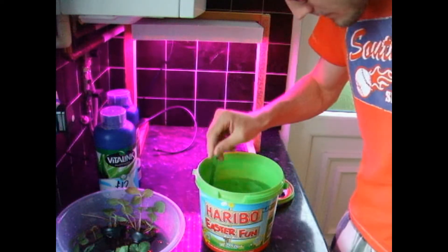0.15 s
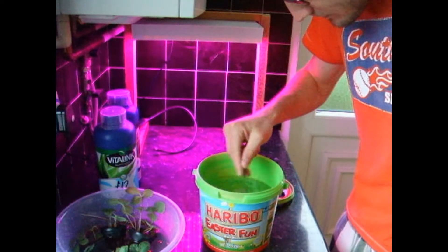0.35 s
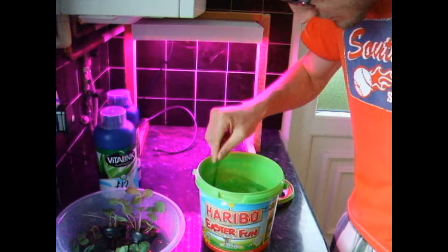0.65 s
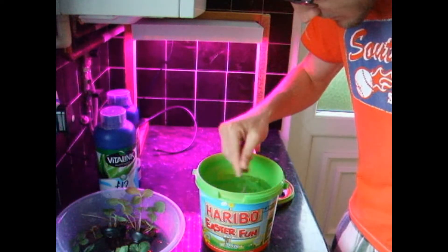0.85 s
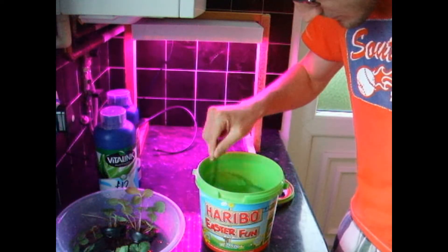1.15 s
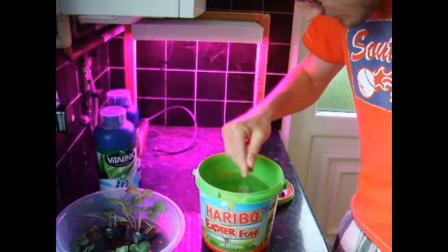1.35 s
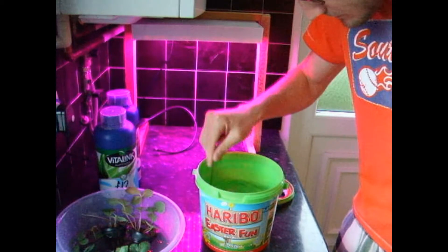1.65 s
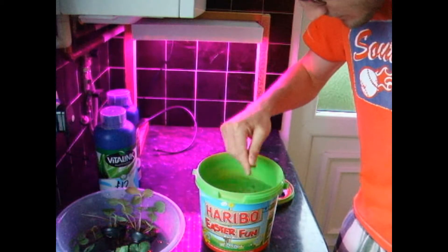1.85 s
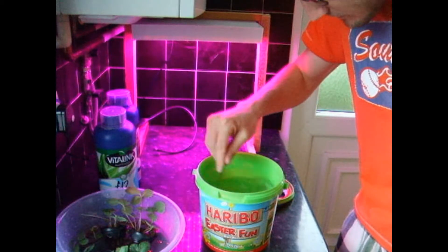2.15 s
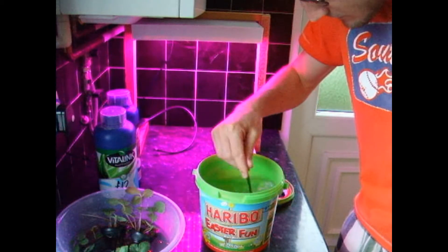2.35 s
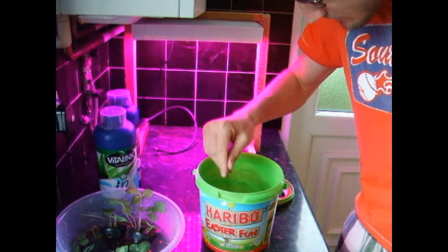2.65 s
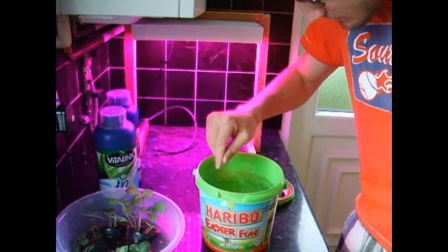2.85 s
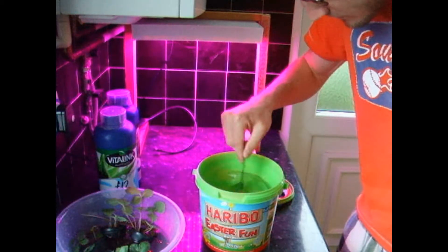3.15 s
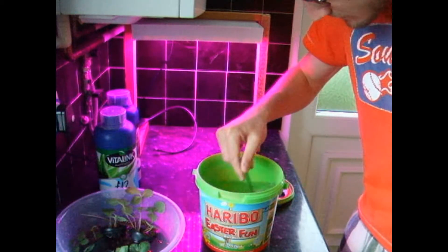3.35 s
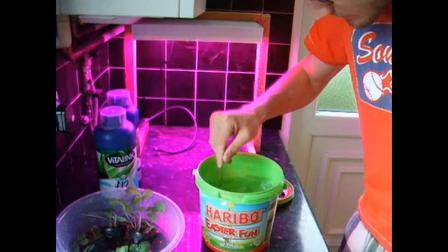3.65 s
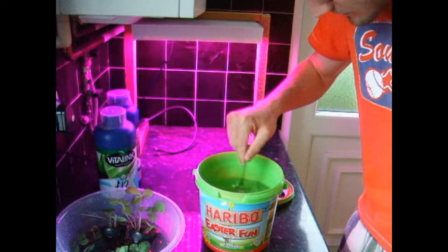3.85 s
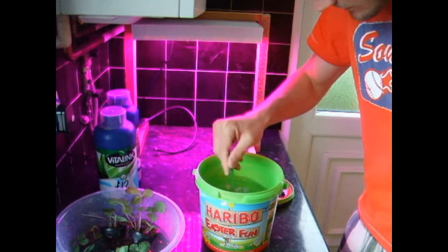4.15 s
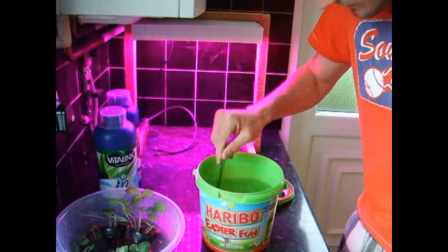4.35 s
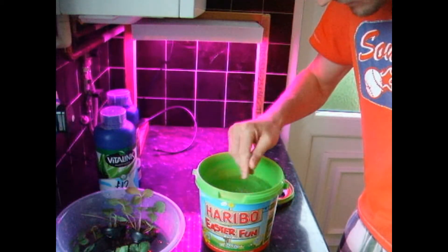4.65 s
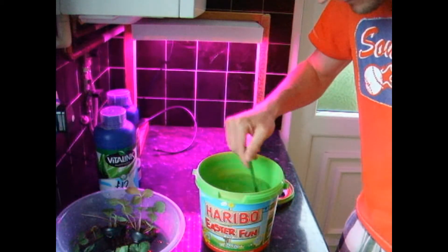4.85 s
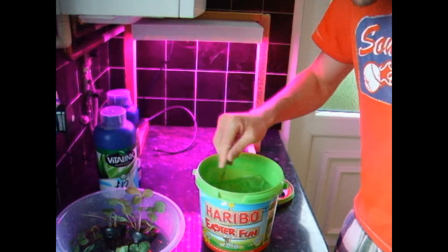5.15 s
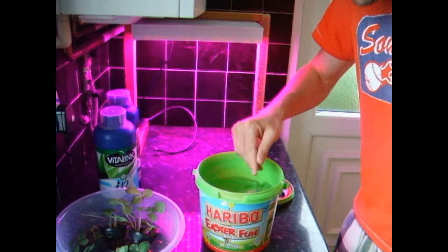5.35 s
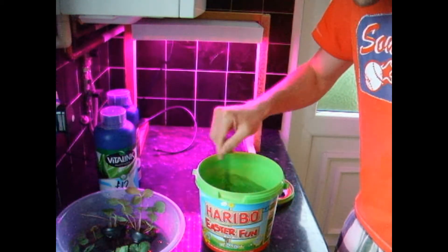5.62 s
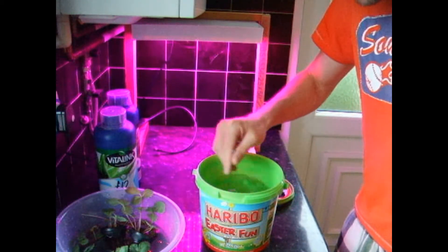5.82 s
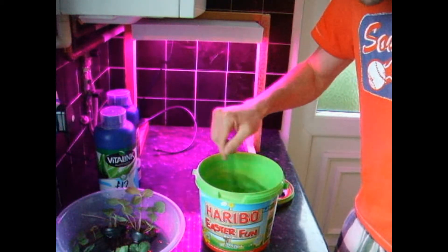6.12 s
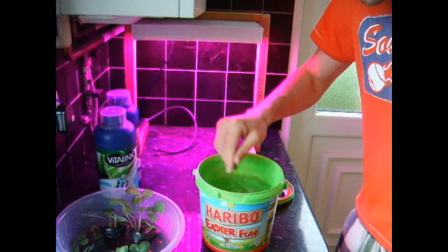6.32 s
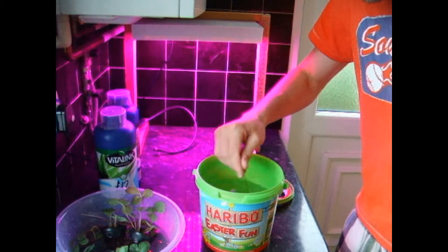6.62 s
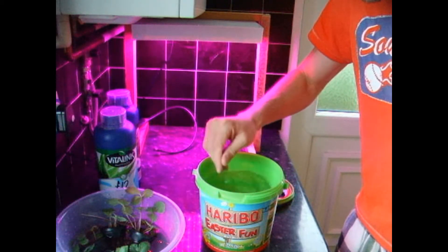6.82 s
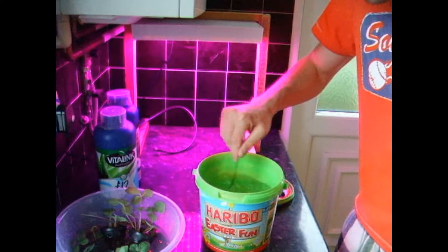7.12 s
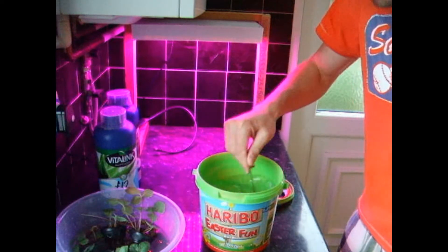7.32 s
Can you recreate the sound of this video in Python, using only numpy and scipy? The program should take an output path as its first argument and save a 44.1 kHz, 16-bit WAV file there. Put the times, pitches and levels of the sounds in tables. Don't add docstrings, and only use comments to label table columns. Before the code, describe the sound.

A thin stick stirs water in a small plastic bucket on a kitchen counter. It knocks the wall a few times a second, dry hollow clacks with short rebounds, between liquid plops, rising bubble blips and light swishes. A low fridge hum and faint hiss run underneath. Close, slightly gritty low-quality microphone, short tiled-room reflections.

```python
import sys
import numpy as np
from scipy import signal
from scipy.fft import rfft, irfft, next_fast_len
from scipy.io import wavfile
from scipy.ndimage import map_coordinates

SR = 44100
rng = np.random.default_rng(int(sys.argv[2]) if len(sys.argv) > 2 else 0)


def invert_db(level):
    return 10 ** (np.asarray(level, dtype=float) / 20)


def output_pcm(signal):
    pcm = np.clip(np.atleast_2d(signal).T, -1, 1) * 32767
    wavfile.write(sys.argv[1], SR, np.round(pcm).astype(np.int16))


N = 329868


def unit(x):
    return x / np.sqrt(np.mean(x ** 2) + 1e-20)


def along(points, hz):
    f, v = np.transpose(points)
    return np.interp(np.log(hz + 1), np.log(f + 1), v)


def wobble(rate_hz):
    knots = rng.standard_normal(int(N * rate_hz / SR) + 4)
    return map_coordinates(knots, [np.arange(N) * rate_hz / SR])


def filtered(x, response):
    m = next_fast_len(N + SR // 2)
    return irfft(rfft(x, m) * response(np.fft.rfftfreq(m, 1 / SR)), m)[..., :N]


def modes(table):
    def response(f):
        total = 0
        for k, (centre_hz, width_hz, level_db) in enumerate(table):
            damping = 1j * f * width_hz
            total = total + (-1) ** k * invert_db(level_db) * damping / (centre_hz ** 2 - f * f + damping)
        return total
    return response


def noise(spectrum):
    return unit(filtered(rng.standard_normal(N), lambda hz: invert_db(along(spectrum, hz))))


def swells(table, rise_s, fall_s, base_db):
    t = np.arange(0, N + 64, 64) / SR
    power = invert_db(base_db) ** 2
    for crest_s, level_db in table:
        shape = np.where(t < crest_s, ((crest_s - t) / rise_s) ** 2, (t - crest_s) / fall_s)
        power = power + invert_db(level_db) ** 2 * np.exp(-2 * shape)
    return np.interp(np.arange(N) / SR, t, np.sqrt(power))


def bubbles(table, onset_s):
    out = np.zeros(N + SR)
    for start_s, peak_db, pitch_hz, t60_s, rise in table:
        t60_s = np.clip(t60_s, .005, .3)
        t = np.arange(int(t60_s * SR)) / SR
        envelope = invert_db(peak_db - 60 * t / t60_s) * (1 - np.exp(-t / onset_s))
        cycles = pitch_hz * (t + rise * t * t / t60_s)
        out[round(start_s * SR):][:len(t)] += envelope * np.sin(2 * np.pi * cycles)
    return out[:N]


# freq_hz, density_db
RUMBLE_SPECTRUM = [(21, -35.5), (36, -3.5), (49, -5), (97, -9.5), (140, -5.5), (194, -13.5), (293, -10),
                   (400, -13.5), (520, -46.5), (880, -120)]
# freq_hz, density_db
AIR_SPECTRUM = [(240, -34), (420, -2.5), (772, 0), (1310, -2), (2090, -16.5), (3030, -7.5), (4240, -24.5),
                (8000, -30)]
# freq_hz, level_db
WHINE_TONES = [(49, -76.5), (7647.5, -85), (7677.5, -74.5), (7707, -76), (7736.5, -84)]


def background():
    t = np.arange(N) / SR
    rumble = invert_db(-60 + 0.35 * wobble(3.4)) * noise(RUMBLE_SPECTRUM)
    air = invert_db(-54.57 + 0.57 * wobble(30)) * noise(AIR_SPECTRUM)
    tones = np.zeros(N)
    for freq_hz, level_db in WHINE_TONES:
        gain = invert_db(level_db + 4.0 + 1.2 * wobble(1.5))
        tones += gain * np.sin(2 * np.pi * freq_hz * t + 0.4 * wobble(12))
    return rumble + air + tones


# crest_s, drone_db
LEAN_CRESTS = [(.02, -58.5), (.46, -60), (.8, -56.5), (1.05, -58.5), (1.37, -60), (1.57, -47.5),
               (1.98, -49), (2.5, -64), (3.29, -54), (3.48, -55.5), (4.06, -57), (4.37, -54), (4.89, -50.5),
               (5.36, -61), (6.06, -50.5), (6.25, -53), (6.38, -49.5), (6.55, -56.5), (6.86, -62),
               (7.46, -48)]


def counter_drone():
    rough = unit(filtered(rng.standard_normal(N), modes([(127.1, 12, -2), (144.0, 18, -1.5)])))
    tone = np.sin(2 * np.pi * 130 * np.arange(N) / SR + 1.8 * wobble(5))
    gain = swells(LEAN_CRESTS, rise_s=.04, fall_s=.083, base_db=-65) * invert_db(-3.5)
    return gain * (.8 * rough + 1.5 * tone)


# centre_hz, width_hz, level_db
BOOM_MODES = [(291.4, 58, 6.5), (344.5, 200, -1)]
# centre_hz, width_hz, level_db
WALL_MODES = [(491.8, 39, -0.5), (576, 63, -2.5), (665, 64, 0), (760, 71, 4), (880, 120, -6),
              (1004, 133, -6)]
# centre_hz, width_hz, level_db
RIM_MODES = [(1000, 48, -8), (1137, 80, -1), (1320, 78, -2), (1440, 70, -5.5), (1562, 72, -4),
             (1800, 240, -14.5)]
# centre_hz, width_hz, level_db
CLICK_MODES = [(2050, 740, -5.5), (2610, 320, 4.5), (3350, 420, -5.5), (4800, 590, -7.5)]
# start_s, peak_db, rim_db, click_db
SHARP_BLOWS = [(.05, -41.5, 6, 0), (.086, -33.5, 0.5, -10.5), (.416, -30.5, -5.5, -8), (.481, -26, -24, -8),
               (.685, -21, -5.5, -12), (0.966, -22, -12, -12), (1.163, -38, -17, 2.5),
               (1.201, -26, -18, -9.5), (1.461, -26, -6.5, -4.5), (1.657, -25.5, -15.5, -9.5),
               (1.918, -24.5, -11, -8.5), (3.277, -35.5, 2.5, -11.5), (3.828, -25.5, -5.5, -9.5),
               (3.9, -32, -4.5, -13), (3.966, -35.5, 3, -4), (4.33, -34, -17.5, -24),
               (4.384, -20.5, -5.5, -9), (4.839, -15, -6.5, -16), (5.155, -25.5, -1, -11),
               (5.432, -21, -6, -9), (5.719, -19.5, -4, -14.5), (6.039, -20.5, -4, -9),
               (6.174, -44.5, 8.5, -3), (6.252, -27.5, -1.5, -7.5), (6.342, -34, 1, -12.5),
               (7.377, -23.5, -9.5, -8)]
# start_s, peak_db, boom_db, rim_db
DEEP_BLOWS = [(.757, -38.5, -5, -3), (1.008, -31, -22.5, -10), (1.051, -45.5, -31, 8.5),
              (1.528, -33, -15, -12.5), (1.591, -37, -28.5, 0.5), (1.697, -29, -9.5, -8.5),
              (1.927, -11, -20.5, -5), (2.146, -28.5, -25.5, -11), (2.199, -39.5, -11, -9.5),
              (2.456, -41, -8.5, 1.5), (2.937, -27, -18.5, -31.5), (3.034, -36.5, -19, -10),
              (3.416, -20, -30, -11), (4.568, -49, 1.5, -14), (5.315, -34, -12, -2.5),
              (6.213, -38.5, -15.5, 0.5), (6.491, -32.5, -22.5, -9)]
# start_s, peak_db, rim_db, boom_db
REBOUND_BLOWS = [(0.486, -28.5, -4, -26.5), (0.692, -26, -5, -26.5), (0.976, -23, -8, -25.5),
                 (1.467, -25.5, -8, -23.5), (1.666, -26, -8.5, -28), (1.705, -26.5, -7.5, -25.5),
                 (1.937, -15, -10, -22.5), (1.937, -11.5, -6, -26.5), (1.969, -17.5, -7, -26),
                 (2.154, -29, -7, -25), (2.946, -28, -9, -27), (3.426, -18.5, -10.5, -28.5),
                 (3.437, -22.5, -9.5, -22), (3.498, -32.5, -10, -24.5), (3.844, -24.5, -9, -26.5),
                 (4.404, -26, -7, -24.5), (4.451, -29, -10, -25), (4.852, -18.5, -8, -25.5),
                 (4.865, -23.5, -7.5, -23), (5.164, -25, -6.5, -26.5), (5.441, -19, -6, -27.5),
                 (5.472, -27.5, -10, -22.5), (5.728, -19, -8, -24), (5.759, -23, -9.5, -24.5),
                 (6.047, -21.5, -8.5, -22), (6.084, -28.5, -8, -26), (6.259, -27.5, -6, -24),
                 (7.386, -30, -7, -23), (7.419, -33, -8, -25.5)]

SHARP_BOOM_DB, SHARP_CONTACT_S = -22, .005
DEEP_CLICK_DB, DEEP_MUFFLES, DEEP_CONTACT_S = -53.5, .83, .0046
HARD_BOOM_DB = {blow[0]: boom_db for blow, boom_db
                in zip(SHARP_BLOWS[16:22], (-25.5, -18.5, -22, -21, -28, -20.5))}
KNOCKS = sorted(
    [(s, db, HARD_BOOM_DB.get(s, SHARP_BOOM_DB), rim_db, click_db, SHARP_CONTACT_S)
     for s, db, rim_db, click_db in SHARP_BLOWS]
    + [(s, db, boom_db, rim_db, DEEP_CLICK_DB - DEEP_MUFFLES * db, DEEP_CONTACT_S)
       for s, db, boom_db, rim_db in DEEP_BLOWS])


def knocks():
    force = np.zeros((4, N + SR))
    t = np.arange(2048) / SR
    attack = 1 - np.exp(-t / [[.005], [.0015], [.0004], [.0007]])
    for start_s, peak_db, boom_db, rim_db, click_db, contact_s in KNOCKS:
        life_s = np.maximum(contact_s * np.array([[1.2], [1.1], [.8], [.55]]), 5e-4)
        chatter = rng.standard_normal((4, len(t))) * np.exp(-t / life_s) * attack
        chatter /= np.linalg.norm(chatter, axis=1)[:, None]
        chatter[:, 8] += [0.36, 0.6, 0.72, 0.13]
        chatter[:, 400] += [0.33, 0.45, 0.35, 0.22]
        drive_db = peak_db + np.array([[49.0 + boom_db], [33], [36.0 + rim_db], [33.5 + click_db]])
        force[:, round(start_s * SR):][:, :len(t)] += invert_db(drive_db) * chatter
    for start_s, peak_db, rim_db, boom_db in REBOUND_BLOWS:
        drive_db = peak_db - 4.5 + np.array([49.5 + boom_db, 33, 36.0 + rim_db])
        force[:3, round(start_s * SR)] += invert_db(drive_db)

    def thin(hz):
        return (1j * hz / (210 + 1j * hz)) ** 2 / (1 + 1j * hz / 6000) ** 2

    bodies = (BOOM_MODES, WALL_MODES, RIM_MODES, CLICK_MODES)
    ringing = sum(filtered(f[:N], modes(body)) for f, body in zip(force, bodies))
    return filtered(ringing, thin)


# freq_hz, density_db
SPLASH_SPECTRUM = [(120, -59.5), (200, -11), (294, -18), (470, -4), (751, -2), (1240, -10), (1370, -2),
                   (2010, -13.5), (6000, -39.5), (7800, -71.5), (13200, -120)]


def slaps():
    burst = np.zeros(N + SR)
    t = np.arange(SR // 4) / SR
    for start_s, peak_db, *_ in KNOCKS:
        decay = invert_db(peak_db - 60 * t / .12)
        burst[round(start_s * SR):][:len(t)] += decay * np.minimum(t / 0.0062, 1)
    lumpy = invert_db(6.6 * wobble(160)) * noise(SPLASH_SPECTRUM)
    churn = filtered(lumpy, lambda hz: hz ** 4 / (hz ** 4 + 196.0 ** 4))
    return invert_db(-14) * burst[:N] * unit(churn)


def gurgle():
    below_db, spread_s, lowest_hz, span = -16, .09, 330, 3.5
    wake = []
    for start_s, peak_db, *_ in KNOCKS * 4:
        a, b, c = rng.random(3)
        level_db = peak_db + below_db - 12.5 * a - 6.5 * b
        wake.append((start_s + .012 + spread_s * a, level_db, lowest_hz * span ** c, .024, .3))
    return bubbles(wake, onset_s=.0015)


# start_s, peak_db, pitch_hz, t60_s, rise_share
GLIDE_BUBBLES = [(.278, -18.5, 2578, 0.028, 0.21), (2.632, -43, 1342, 0.072, 0.08),
                 (6.798, -39.5, 1410, 0.047, 0.18), (0.284, -21.5, 2990, 0.0063, 0.2),
                 (0.39, -42, 1225, 0.13, 1.2), (5.439, -21, 620, .025, 1.0), (3.425, -15, 820, .018, .3),
                 (5.727, -17, 880, .018, .3), (1.931, -16, 1000, .03, .15), (1.944, -18, 560, .04, .15),
                 (4.85, -20, 800, .025, .2), (.974, -25, 700, .025, .2), (3.417, -24, 950, .015, .2),
                 (5.721, -24, 1150, .02, .1), (1.932, -27, 300, .07, .05), (3.42, -31, 265, .06, .05),
                 (6.044, -33, 280, .07, .05), (1.704, -29, 330, .05, .2), (7.39, -32, 520, .04, .1),
                 (1.169, -4.5, 1504, 0.0094, 0.072), (1.336, -35, 1193, 0.093, 0.77),
                 (2.087, -32, 1460, 0.031, 0.043), (3.165, -35, 825, 0.16, 0.019),
                 (3.193, -30, 1000, 0.067, 1.3), (4.213, -33.5, 1266, 0.039, 0.044),
                 (5.147, -25.5, 808, 0.063, 1.57), (5.159, -24.5, 1374, 0.049, 0.37),
                 (0.403, -33, 2323, 0.029, 0.3), (.585, -30.5, 2050, 0.023, 0.17),
                 (1.401, -34, 1520, 0.026, 0.23), (1.72, -34.5, 511, 0.046, 0.037),
                 (3.06, -47, 1517, 0.065, 0.58), (7.275, -35.5, 1901, .09, 0.046),
                 (3.249, -38.5, 1800, 0.026, 0.24), (6.51, -35, 695, 0.15, 0.012),
                 (7.226, -37, 1894, 0.12, 0.036), (7.228, -37, 2400, .02, 0.15)]
# start_s, peak_db, pitch_hz, t60_s
TRAIL_BUBBLES = [(0.28, -32.5, 3306, 0.014), (.44, -37.5, 2870, 0.024), (.452, -38.5, 1553, 0.047),
                 (1.196, -33, 2600, 0.015), (1.409, -38, 2820, 0.024), (1.45, -34, 3400, 0.012),
                 (1.71, -33.5, 553, .05), (1.925, -34.5, 3150, 0.019), (3.08, -41, 2400, 0.034),
                 (3.11, -42, 2305, 0.034), (3.166, -42.5, 2690, 0.034), (3.2, -39, 798, 0.04),
                 (3.229, -37, 3310, .025), (3.235, -38, 6360, 0.013), (3.249, -36, 2690, 0.027),
                 (3.27, -37.5, 3710, 0.011), (3.27, -36.5, 811, .04), (3.68, -35.5, 3350, 0.024),
                 (3.734, -37.5, 2610, .03), (4.2, -35, 1304, .04), (4.3, -36.5, 704, .04),
                 (4.312, -42, 2800, .02), (4.445, -41.5, 2700, .02), (4.62, -43, 940, .05),
                 (4.635, -40.5, 1342, .04), (5.033, -40.5, 1100, .03), (5.093, -38, 596, .04),
                 (5.438, -30.5, 2550, 0.017), (5.468, -31.5, 1576, .03), (6.006, -41.5, 2730, 0.016),
                 (6.775, -34, 1500, .05), (6.83, -39, 1480, .05), (6.87, -41, 1550, .04),
                 (7.381, -35, 300, .06), (1.728, -33, 480, .04), (7.148, -41, 3284, 0.026),
                 (7.2, -41, 3320, 0.037), (7.218, -37, 2183, 0.027), (7.266, -36.5, 3280, .04),
                 (7.284, -24, 1553, .03), (7.31, -36, 2755, 0.036), (7.314, -32, 1587, 0.034),
                 (7.332, -39.5, 3186, .04), (7.334, -33, 1493, .03)]
# start_s, peak_db, pitch_hz, t60_s
LARGE_BUBBLES = [(.381, -30, 1204, 0.014), (.585, -23.5, 1320, 0.037), (0.61, -23.5, 1531, 0.053),
                 (1.11, -29.5, 1660, 0.026), (1.168, -15.5, 1080, 0.041), (1.316, -24, 1109, 0.05),
                 (2.059, -26.5, 1126, 0.027), (2.551, -36.5, 1602, 0.036), (2.582, -30.5, 1765, 0.025),
                 (3.208, -19, 1470, 0.02), (3.226, -26.5, 1395, 0.023), (3.682, -32.5, 1710, 0.05),
                 (3.749, -38, 989, 0.05), (3.898, -36, 795, 0.093), (3.966, -22, 1440, 0.012),
                 (4.2, -29, 1039, 0.031), (4.261, -32, 1314, 0.075), (4.713, -34, 1440, 0.042),
                 (4.733, -30.5, 1440, 0.045), (4.766, -24.5, 1486, 0.016), (5.067, -24, 1440, 0.023),
                 (5.388, -24.5, 1537, 0.027), (6.492, -20, 654, 0.023), (6.611, -31, 1320, 0.027),
                 (6.733, -29, 1294, 0.046), (6.757, -17, 1440, 0.012), (7.199, -32, 1343, 0.068),
                 (7.217, -27.5, 1482, 0.035), (7.235, -23, 1440, 0.04), (7.269, -9.5, 1513, 0.016)]
# start_s, peak_db, pitch_hz
SPRAY_DROPS = [(0.435, -40, 3870), (0.441, -29, 4870), (1.163, -29, 4520), (2.056, -33, 5600),
               (2.083, -33, 4460), (3.234, -38, 4940), (3.26, -33, 4150), (4.047, -34.5, 4790),
               (5.159, -32.5, 5040), (5.65, -39.5, 4330), (7.236, -38, 4850), (7.279, -36, 4800),
               (7.304, -36, 5400)]
# start_s, peak_db, pitch_hz
SMALL_BUBBLES = [(.601, -30.5, 2350), (1.109, -33, 2650), (1.383, -30.5, 2526), (1.633, -35.5, 2710),
                 (1.653, -32, 2774), (1.907, -30.5, 2720), (2.084, -31, 2650), (2.554, -32, 2230),
                 (2.581, -37, 2500), (2.627, -36.5, 2946), (2.74, -40.5, 3160), (3.234, -47, 2100),
                 (3.233, -30, 2580), (3.267, -31, 2966), (3.68, -18.5, 2434), (3.898, -34, 3000),
                 (4.712, -38, 2600), (4.766, -35.5, 2500), (4.798, -36.5, 2820), (5.393, -31, 2634),
                 (5.636, -36, 2680), (5.976, -34, 2610), (5.993, -39.5, 2725), (6.694, -33, 2700),
                 (6.738, -37, 2355), (6.783, -33.5, 2400), (7.148, -39.5, 2580), (7.243, -27.5, 3123),
                 (7.274, -28.5, 2697), (7.311, -31, 3126)]
# start_s, peak_db, pitch_hz
GLUG_POCKETS = [
    (1.703, -37, 372),
    (1.749, -47, 318),
    (2.231, -38, 457),
    (2.779, -40.5, 504),
    (2.84, -44, 297.4),
    (7.39, -38, 318.5),
]


def free(table, cycles, rise):
    return [(s, db, hz, cycles / hz, rise) for s, db, hz in table]


def trapped_bubbles():
    large = [(*bubble, .058) for bubble in LARGE_BUBBLES + TRAIL_BUBBLES]
    out = bubbles(large + GLIDE_BUBBLES, onset_s=.0016)
    out += bubbles(free(SMALL_BUBBLES + SPRAY_DROPS, cycles=41.7, rise=.16), onset_s=.00038)
    return out + bubbles(free(GLUG_POCKETS, cycles=30, rise=.13), onset_s=.0028)


def shed_bubbles():
    shed = []
    for start_s, peak_db, pitch_hz, *_ in (LARGE_BUBBLES + SMALL_BUBBLES) * 3:
        a, b, c = rng.random(3)
        shed.append((start_s + .045 * a, peak_db - 6.5 - 8 * b, .85 * pitch_hz * 1.6 ** c, .012, .2))
    return bubbles(shed, onset_s=.0027)


# crest_s, level_db
TRICKLE_CRESTS = [(.3, -53), (.42, -49.5), (.7, -51.5), (1.2, -49.5), (1.4, -56), (1.66, -53), (1.95, -48),
                  (2.09, -51), (2.6, -53.5), (3.1, -54.5), (3.26, -48), (3.45, -56), (3.9, -53),
                  (4.32, -53), (4.43, -51), (4.78, -54), (5.42, -54), (5.99, -55.5), (6.75, -52.5),
                  (7.16, -55.5), (7.27, -48), (7.4, -49.5)]
# freq_hz, density_db
TRICKLE_SPECTRUM = [(1500, -40.5), (2100, -6), (2700, 1), (3300, -2), (3900, -15.5), (5500, -16.5),
                    (8000, -43.5)]


def trickle():
    grains = unit(invert_db(3 * wobble(220) + 2.5 * wobble(40)) * noise(TRICKLE_SPECTRUM))
    return swells(TRICKLE_CRESTS, rise_s=.025, fall_s=.05, base_db=-79.5) * grains


# crest_s, water_db
SURGE_CRESTS = [(.45, -45.5), (.62, -45.5), (.74, -43), (.98, -41.5), (1.06, -44), (1.32, -40.5),
                (1.53, -46), (1.72, -50.5), (1.8, -55), (1.98, -36), (2.08, -41.5), (2.6, -46), (3.21, -40),
                (3.31, -45), (3.44, -45), (3.84, -42), (4.24, -40), (4.37, -57.5), (4.52, -44.5),
                (4.89, -41), (5.17, -52), (5.36, -43.5), (6.07, -42.5), (6.25, -40.5), (6.55, -54.5),
                (6.88, -49.5), (7.25, -45), (7.41, -46.5)]


def swish():
    slosh = unit(invert_db(3 * wobble(25)) * noise(SPLASH_SPECTRUM))
    fizz = [(N / SR * a, -4 - 3 * np.log(1 - b), 700 * 5 ** c, .008, .3) for a, b, c in rng.random((280, 3))]
    gain = swells(SURGE_CRESTS, rise_s=.019, fall_s=.044, base_db=-62.5) * invert_db(-10)
    return gain * (slosh + bubbles(fizz, onset_s=.00066))


# start_s, peak_db, pitch_hz, t60_s, rise_share
PLOP_PARTS = [
    (.648, -6, 1465, .03, .011),
    (.649, -15, 1490, .09, .011),
    (.7, -30, 1480, .28, .002),
]


def plop():
    return bubbles(PLOP_PARTS, onset_s=.0016)


# centre_hz, width_hz, level_db
HOLLOW_MODES = [(765, 34, 2.5), (1161, 8, -7.5), (1438, 29, 5), (1526, 21, -1.5), (1660, 22, 1),
                (2650, 14, 0), (2820, 27, -8)]


def bucket_hollow(ringing, stick):
    from_water = filtered(invert_db(-1) * ringing, modes(HOLLOW_MODES))
    from_stick = filtered(invert_db(-15.5) * stick, modes(HOLLOW_MODES[:5]))
    return from_water + from_stick


# freq_hz, t60_s
ROOM_DECAY = [(150, 0.36), (700, 0.25), (1500, 0.33), (3000, 0.32), (8000, 0.32)]
# delay_s, level_db
NEAR_ECHOES = [(.0023, -27), (.0046, 3), (.0071, -11.5), (.0095, 3.5), (0.0127, -2), (.0152, -8),
               (.021, -5.5), (.039, -6)]
# freq_hz, level_db
ROOM_COLOUR = [(100, 2.5), (800, 3), (1500, -1), (2100, -5.5), (2700, -1.5), (3300, 0.5), (4200, -2.5),
               (8000, -18)]


def kitchen(x):
    late = np.zeros(N + SR)
    hop = SR // 6
    for start in range(0, N, hop):
        hz, t, z = signal.stft(rng.standard_normal(SR // 2), SR, nperseg=256)
        decay = invert_db(-60 * t / along(ROOM_DECAY, hz)[:, None])
        tail = signal.istft(z * decay, SR, nperseg=256)[1]
        tail *= 1 - np.exp(-np.arange(len(tail)) / SR / 0.0022)
        wet = signal.fftconvolve(x[start:start + hop], tail / np.linalg.norm(tail))
        late[start:][:len(wet)] += wet

    def echoes(hz):
        return sum(invert_db(db) * np.exp(-2j * np.pi * hz * s) for s, db in NEAR_ECHOES)

    answer = invert_db(1.5) * late[:N] + invert_db(-10.5) * filtered(x, echoes)
    return filtered(answer, lambda hz: invert_db(along(ROOM_COLOUR, hz)))


def scene():
    stick = knocks()
    burst = plop()
    plop_share = invert_db(-9)
    ringing = trapped_bubbles() + shed_bubbles() + swish() + slaps() + plop_share * burst
    wet = kitchen(invert_db(-3) * stick + invert_db(-1) * ringing)
    out = background() + counter_drone() + stick + ringing + bucket_hollow(ringing, stick) + wet
    out += gurgle() + trickle() + (1 - plop_share) * burst
    return out[None]


# freq_hz, level_db
SMOOTHING_FILTER = [(4400, -1.05), (5300, 0.5), (6200, -4.5), (7500, -2.5), (8000, -6), (8350, -14.5),
                    (8750, -27.5), (9100, -62.5)]


def coarse_converter(dry):
    rate_hz, step, rest = 16000, .0055, .0004
    offset = -.0024
    count = N * rate_hz // SR
    slow = irfft(rfft(dry)[:, :count // 2 + 1], count) * count / N
    steps = np.fft.fft(step * np.round((slow + offset) / step) + rest)
    hz = np.fft.rfftfreq(N, 1 / SR)
    mirrored = steps[:, np.arange(len(hz)) % count]
    return irfft(mirrored * invert_db(along(SMOOTHING_FILTER, hz)), N) * N / count


def low_pass(x):
    return signal.sosfilt(signal.butter(12, 8890, fs=SR, output="sos"), x)


def record(dry):
    mix = coarse_converter(dry)
    return low_pass(mix)


dry = scene()
out = record(dry)
output_pcm(out)
```